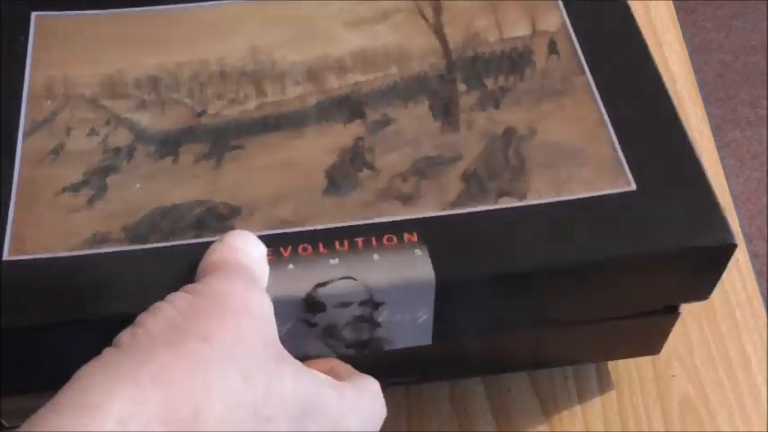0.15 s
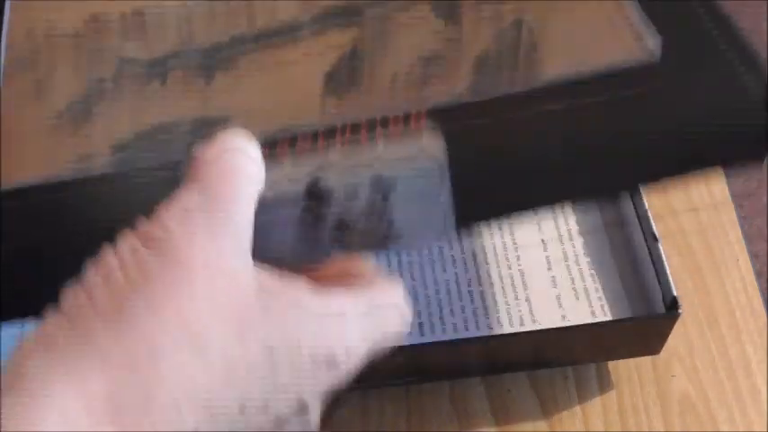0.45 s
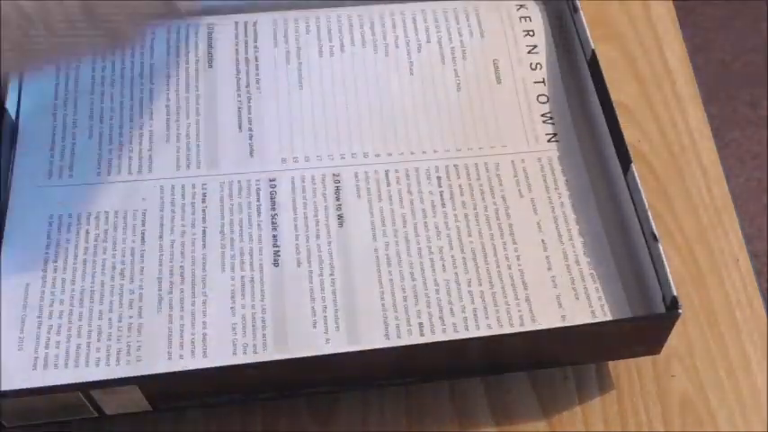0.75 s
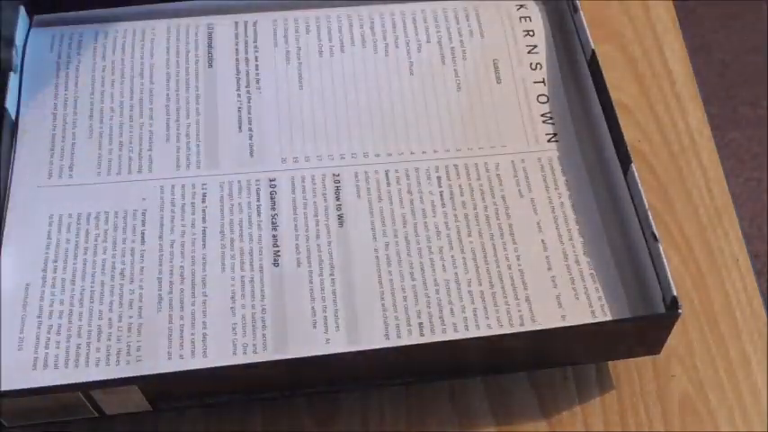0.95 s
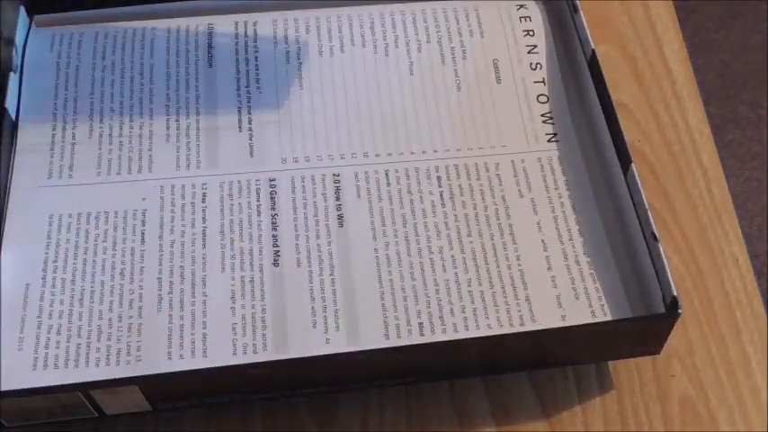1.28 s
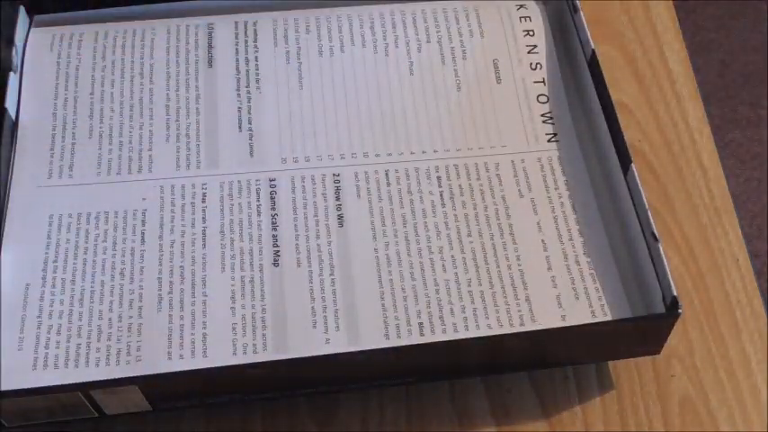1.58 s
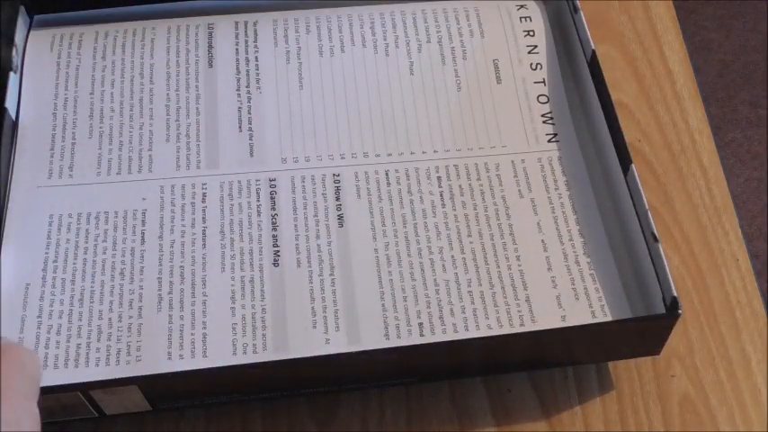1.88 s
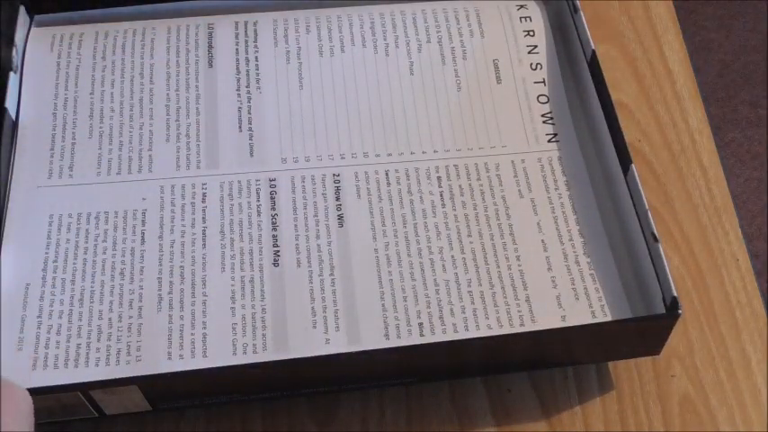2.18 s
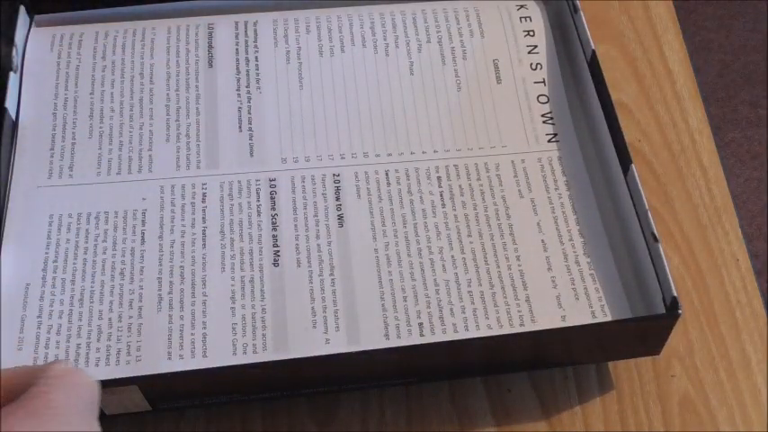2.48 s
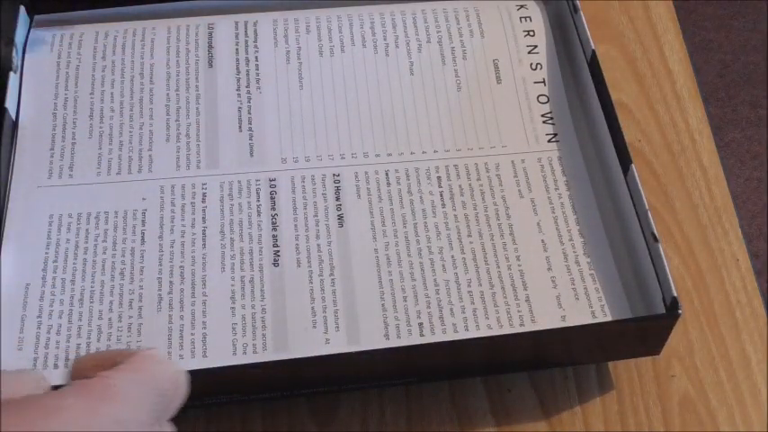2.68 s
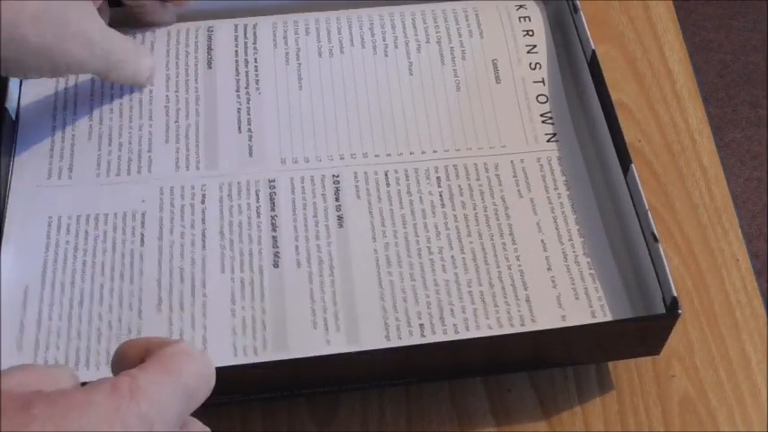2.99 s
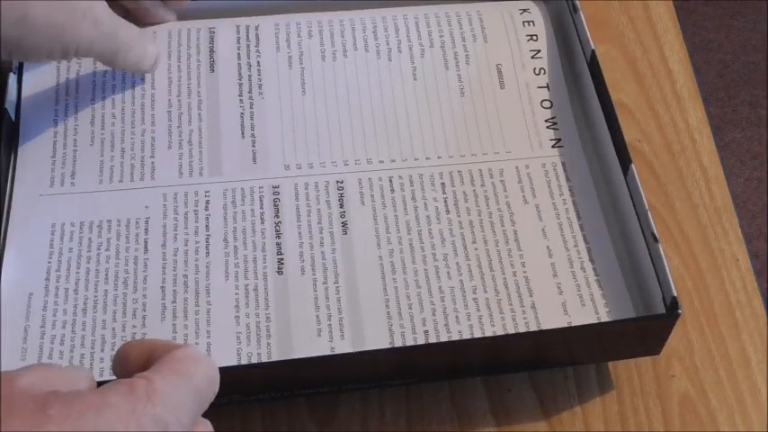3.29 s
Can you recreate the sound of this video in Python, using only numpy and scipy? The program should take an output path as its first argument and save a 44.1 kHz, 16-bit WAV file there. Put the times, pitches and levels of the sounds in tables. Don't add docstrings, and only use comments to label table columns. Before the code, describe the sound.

A cardboard box lid jerks loose with hollow pops, then small shuffles and taps, a firm clack near two seconds, and the loudest knocks around two and a half seconds; close microphone, small quiet room.

```python
import sys
import numpy as np
from scipy import signal
from scipy.fft import rfft, irfft, next_fast_len
from scipy.io import wavfile
from scipy.ndimage import map_coordinates

SR = 44100
rng = np.random.default_rng(int(sys.argv[2]) if len(sys.argv) > 2 else 0)


def magnitude_from_level(level_db):
    exponent = np.asarray(level_db, float) / 20
    return 10 ** exponent


def master_out(mix):
    frames = np.transpose(np.atleast_2d(mix))
    ceiling = np.clip(frames, -1, 1)
    pcm = np.round(ceiling * 32767).astype(np.int16)
    wavfile.write(sys.argv[1], SR, pcm)


N = 152145


def unit(x):
    return x / np.sqrt(np.mean(x ** 2) + 1e-20)


def along(points, hz):
    f, value = np.transpose(points)
    return np.interp(np.log(hz + 1), np.log(f + 1), value)


def wobble(rate):
    knots = rng.standard_normal(int(N * rate / SR) + 4)
    return map_coordinates(knots, [np.arange(N) * rate / SR])


def filtered(x, response):
    m = next_fast_len(N + SR // 2)
    return irfft(rfft(x, m) * response(np.fft.rfftfreq(m, 1 / SR)), m)[..., :N]


def colour(points):
    closed = [(points[0][0] / 3, -90)] + list(points)
    return lambda hz: magnitude_from_level(along(closed, hz))


# f/Hz, left-right likeness
PORT_LIKENESS = [(60, 1), (300, 0.69), (1500, 0.38), (5000, 0.64), (12000, 0.02)]


def spread(pair):
    def mid_side(hz):
        turn = np.arccos(np.clip(along(PORT_LIKENESS, hz), -1, 1)) / 2
        return np.array([np.cos(turn), np.sin(turn)])
    mid, side = filtered(pair, mid_side)
    return np.array([mid + side, mid - side])


def add(track, s, sound):
    track[round(s * SR):][:len(sound)] += sound


def ring(hz, db, t60, t, rise, wander=0):
    decay = magnitude_from_level(db - 60 * t / t60)
    return decay * np.sin(2 * np.pi * hz * t + wander) * (1 - np.exp(-t / rise))


# f/Hz, level/dB per Hz
AIR_COLOUR = [(141, 4), (240, -7), (354, 0), (734, -12), (1230, -12.5), (2760, -28), (6000, -36.5),
              (11000, -27), (16000, -33)]
# f/Hz, level/dB
CLOTH_COLOUR = [(1200, -4), (2500, -11), (4000, -7), (6000, -9.5), (9000, -7), (16000, -17)]
# t/s, level/dB
SLEEVE_MOVES = [
    (0, -67.5),
    (.62, -67),
    (1.9, -63.5),
    (2.08, -73),
    (3.45, -78),
]
AIR_DB = -56.5


def air():
    still, cloth = (unit(spread(filtered(rng.standard_normal((2, N)), colour(c))))
                    for c in (AIR_COLOUR, CLOTH_COLOUR))
    s, db = np.transpose(SLEEVE_MOVES)
    sleeve_db = np.interp(np.arange(N) / SR, s, db)
    return magnitude_from_level(AIR_DB + 0.13 * wobble(1.9)) * still + magnitude_from_level(sleeve_db + 0.61 * wobble(11)) * cloth


# f/Hz, level/dB per Hz
RUMBLE_COLOUR = [(25, 16), (60, -4.5), (110, -2), (200, -19)]
RUMBLE_DB, RUMBLE_SWING_DB = -57.5, -0.5


def rumble():
    lumps = magnitude_from_level(RUMBLE_SWING_DB * np.array([wobble(4.6), wobble(4.86)]))
    shudder = filtered(rng.standard_normal((2, N)), colour(RUMBLE_COLOUR + [(400, -90)]))
    return magnitude_from_level(RUMBLE_DB) * lumps * unit(shudder)


# t/s, length/s, level/dB, hiss over body/dB, loudest panel f/Hz
SLIDES = [(0, 0.17, -45, -19.5, 590), (0.17, 0.15, -50, -27, 900), (0.38, 0.048, -44.5, -11, 530),
          (0.512, 0.041, -49, -8, 1020), (0.597, 0.043, -46, -12, 1060), (0.68, 0.075, -54, -8, 1060),
          (0.864, 0.063, -52.5, -9.5, 900), (0.968, 0.033, -48, -11, 1250), (1.069, 0.044, -47, -9, 900),
          (0.201, 0.018, -48.5, -1, 1000), (1.603, 0.032, -63, -21, 1250), (3.12, 0.024, -59.5, -2, 1250),
          (2.961, 0.021, -66, 4, 1250), (2.298, 0.15, -58, -22, 345), (1.142, 0.074, -46, -8, 820),
          (1.283, 0.058, -54.5, -10, 520), (1.56, 0.098, -71, -0.5, 1250), (1.723, 0.031, -45, -15, 313),
          (1.931, 0.048, -40.5, -17.5, 640), (2.184, 0.017, -39.5, -19.5, 550),
          (2.298, 0.28, -66.5, 1.5, 1110), (2.47, 0.053, -34, -7.5, 625), (2.591, 0.057, -33.5, -14.5, 656),
          (2.626, 0.026, -37, -9.5, 900), (2.984, 0.056, -48.5, -10.5, 1250), (3, 0.02, -42, -33, 640),
          (3.247, 0.025, -55, -10.5, 600), (1.648, 0.034, -70, -32, 660)]
# f/Hz, width/Hz, level/dB
RUBBED_PANELS = [(149, 133, 5.5), (359, 97, 1), (450, 107, -4.5), (640, 65, -7.5), (900, 196, -8),
                 (1250, 117, -2), (2126, 680, -9.5)]
# f/Hz, level/dB
HISS_COLOUR = [(1500, 7.5), (2300, -1), (2900, 0.5), (4000, 4.5), (6000, -5.5), (10000, -5.5), (16000, -22)]
SLIDE_RISE, SLIDE_FALL_S = 0.12, 0.03
GRAINS_PER_S, GRAIN_DB, GRAIN_SHARE = 1200, 2.5, 0.4
FOCUS_DB_PER_OCT = 8.5


def slides():
    t = np.arange(N) / SR
    shape = np.array([
        magnitude_from_level(db) * np.clip((t - s) / (SLIDE_RISE * length), 0, 1)
        * np.exp(-np.clip(t - s - length, 0, None) / SLIDE_FALL_S)
        for s, length, db, _, _ in SLIDES])
    *_, hiss_db, focus_hz = np.transpose(SLIDES)

    when, size, sign = rng.random((3, N))
    grains = (when < GRAINS_PER_S / SR) * magnitude_from_level(-GRAIN_DB * np.log(size + 0.0033)) * np.sign(sign - 0.5)
    rasp = GRAIN_SHARE * unit(grains) + (1 - GRAIN_SHARE) * rng.standard_normal((2, N))
    rasp = rasp * magnitude_from_level(1.5 * wobble(60))

    body = np.zeros(N)
    for k, (hz, width, db) in enumerate(RUBBED_PANELS):
        def panel(f):
            resonance = 1j * f * width / (hz * hz - f * f + 1j * f * width)
            return resonance / (1 + (f / 2600) ** 4)
        drive = magnitude_from_level(-FOCUS_DB_PER_OCT * abs(np.log2(hz / focus_hz))) @ shape
        body += (-1) ** k * magnitude_from_level(db) * drive * unit(filtered(rasp[0], panel))

    soft = rng.standard_normal((2, N)) * magnitude_from_level(1.5 * wobble(45) + 1.5 * wobble(200))
    hiss = unit(spread(filtered(soft + 0.23 * rasp, colour(HISS_COLOUR))))
    return body, hiss * (magnitude_from_level(hiss_db) @ shape)


# t/s, peak level/dB, f/Hz
TICKS = [(0.0303, -41.5, 8700), (.1745, -46, 4050), (.178, -48, 12400), (.207, -33.5, 7170),
         (0.2188, -26.5, 3500), (.224, -46, 10500), (.388, -41, 4040), (1.947, -45, 4170),
         (1.905, -25.5, 3690), (2.446, -55, 4300), (2.614, -40, 4000), (2.645, -41, 10200),
         (2.696, -24, 3970), (2.697, -41.5, 8350), (2.706, -37, 3900), (2.713, -41, 3810)]
TICK_T60_S, TICK_SPREAD = 0.013, 0.075


def ticks():
    out, t = np.zeros(N + SR), np.arange(SR // 50) / SR
    for s, db, hz in TICKS:
        for offset, phase in zip(np.linspace(-2, 2, num=16), rng.standard_normal(16)):
            mode_hz = hz * np.exp(TICK_SPREAD * offset)
            add(out, s, ring(mode_hz, db - 10, TICK_T60_S, t, 3 / hz, 2 * phase))
    return out[:N]


# t/s, peak level/dB, f/Hz
DULL_KNOCKS = [(0.145, -22.5, 427), (0.173, -17.5, 450), (.187, -35, 450), (0.221, -30, 432),
               (.306, -34, 431), (0.386, -37, 416), (.43, -43, 422), (0.499, -43, 302), (.528, -36.5, 313),
               (0.674, -35, 292), (.625, -41.5, 318), (0.652, -31, 400), (.658, -33, 590),
               (0.824, -39.5, 241), (0.836, -30, 410), (1.118, -32, 392), (1.148, -34, 341),
               (1.18, -37.5, 300), (1.245, -44, 426), (1.658, -42.5, 674), (1.652, -27.5, 333),
               (1.672, -36, 280), (1.7, -33.5, 233), (1.731, -49, 333), (1.771, -50, 360),
               (1.896, -36, 203), (1.906, -24, 443), (1.911, -23.5, 640), (1.959, -34, 376),
               (2.18, -35.5, 425), (2.478, -17.5, 477), (2.497, -14.5, 259.6), (2.447, -32, 450),
               (2.585, -27, 660), (2.676, -29.5, 260), (2.652, -27, 450), (2.984, -36, 440),
               (3.156, -31, 458)]
# t/s, peak level/dB, f/Hz, edge crack over knock/dB
HARD_KNOCKS = [(0.151, -21.5, 1140, -19.5), (.174, -20.5, 1150, -20.5), (0.206, -12.5, 950, -17),
               (.238, -30, 1040, -13.5), (.295, -36, 900, -29), (0.218, -21, 900, -18),
               (0.535, -33, 1080, -26), (0.654, -39.5, 1180, -3), (0.825, -39.5, 910, 1),
               (0.913, -38, 1200, -3.5), (1.118, -39.5, 870, -1), (1.147, -37.5, 900, -17),
               (1.894, -46.5, 1290, -27), (1.904, -22.5, 1250, -30.5), (2.181, -38.5, 1250, -12),
               (2.448, -34, 1010, -9), (2.476, -12, 1140, -9.5), (2.583, -15.5, 1093, -19),
               (2.631, -17, 1075, -15), (2.59, -28, 1210, -23), (2.652, -24, 1130, -24),
               (2.667, -30.5, 1250, -25), (2.891, -44.5, 1400, -15.5), (3.015, -39, 1270, -18),
               (3.154, -32.5, 735, -15), (3.21, -42.5, 1260, -18.5), (3.291, -45.5, 1010, -19)]
# f/Hz, level/dB, t60/s
PANELS = [(219.4, -1, 0.16), (303.5, 1, 0.057), (373.6, -1.5, 0.13), (439.3, -1.5, 0.23),
          (568.5, 4.5, 0.043), (636.8, -1.5, 0.1), (751.5, -7, 0.071), (825, 2.5, 0.046), (1010, -3, 0.059),
          (1260, 9.5, 0.02), (1424, 5.5, 0.02)]
# f/Hz, level/dB
CRACK_COLOUR = [(1200, -7), (2200, 4), (2900, -5), (4000, 0.5), (6000, -12), (10000, -8.5), (16000, -21.5)]
DULL_CRACK_DB, DULL_DB_PER_OCT = -34.5, 4.5
POP_CYCLES, POP_RISE_CYCLES, POP_DB = 14.3, 0.95, 5.5
POP_SAG = 2
RING_DB, NEAR_DB_PER_OCT = -10.5, 5.5
PANEL_WANDER = 1.25
CRACK_T60_S = 0.02
RAGGED_DB, RAGGED_T60_S = -13.5, 0.075


def knocks():
    low, edge, t = np.zeros(N + SR), np.zeros(N + SR), np.arange(SR // 4) / SR
    ragged = magnitude_from_level(6 * wobble(300))
    drift = PANEL_WANDER * wobble(40)
    dull = [(*row, DULL_CRACK_DB, DULL_DB_PER_OCT) for row in DULL_KNOCKS]
    hard = [(*row, 0) for row in HARD_KNOCKS]
    for s, db, hz, crack_db, dull_db in dull + hard:
        luck = rng.standard_normal((len(PANELS), 2))
        starts = rng.integers(N - len(t), size=len(PANELS))
        neighbours = np.zeros(len(t))
        for (f, level, t60), (louder, sharper), i in zip(PANELS, luck, starts):
            octaves = np.log2(f / hz)
            level = level + 2 * louder - NEAR_DB_PER_OCT * abs(octaves) - dull_db * max(octaves, 0)
            wander = drift[i:i + len(t)] - drift[i]
            neighbours += ring(f * (1 + 0.021 * sharper), level, t60, t, 0.0007, wander)
        sag = -np.pi * POP_SAG * hz * t ** 2
        pop = ring(hz, POP_DB, POP_CYCLES / hz, t, POP_RISE_CYCLES / hz, sag)
        add(low, s, magnitude_from_level(db) * (pop + magnitude_from_level(RING_DB) * neighbours))

        tearing = magnitude_from_level(RAGGED_DB - 60 * t / RAGGED_T60_S) * ragged[starts[0]:][:len(t)]
        crack = (magnitude_from_level(-60 * t / CRACK_T60_S) + tearing) * (1 - np.exp(-t / 0.00023))
        add(edge, s, magnitude_from_level(db + crack_db) * crack * rng.standard_normal(len(t)))
    return low[:N], filtered(edge[:N], colour(CRACK_COLOUR)) * magnitude_from_level(7.0)


# t/s, peak level/dB, f/Hz, t60/s
TABLE_BLOWS = [(0.207, -34, 147.3, 0.34), (0.499, -51.5, 145.5, 0.15), (0.528, -47.5, 143, .2),
               (0.653, -37.5, 139, 0.18), (0.828, -39, 148.7, 0.68), (0.92, -39, 146.7, 0.37),
               (1.119, -45, 155, 0.17), (1.158, -41, 197, .12), (1.303, -53.5, 145, .2),
               (1.66, -39, 164, 0.16), (1.901, -29.5, 149.4, .34), (2.232, -34.5, 148.7, 0.32),
               (2.479, -23, 147.7, 0.3), (2.583, -30.5, 148, 0.21), (2.61, -28, 188, 0.1),
               (2.653, -31.5, 149, 0.45), (3.163, -52.5, 146, 0.33)]
TOP_RISE_S, TOP_DB, TOP_WANDER = 0.0012, 6.5, 0.68
TOP_OVERTONE, TOP_OVERTONE_DB = 1.9, -16


def table():
    top, t, drift = np.zeros(N + SR), np.arange(SR // 2) / SR, wobble(24.87)
    for s, db, hz, t60 in TABLE_BLOWS:
        wander = np.roll(drift, -round(s * SR))[:len(t)]
        wander = TOP_WANDER * (wander - wander[0])
        add(top, s, ring(hz, db + TOP_DB, t60, t, TOP_RISE_S, wander))
        add(top, s, ring(TOP_OVERTONE * hz, db + TOP_OVERTONE_DB, t60, t, TOP_RISE_S))
    return top[:N]


STAPLE_S, STAPLE_HZ, STAPLE_DB, STAPLE_T60_S, STAPLE_FLUTTER_DB = 0.208, 7150, -50, 0.28, 3


def staple():
    out, t = np.zeros(N + SR), np.arange(SR // 4) / SR
    wander = wobble(590)[:len(t)]
    note = ring(STAPLE_HZ, STAPLE_DB, STAPLE_T60_S, t, 20 / STAPLE_HZ, wander)
    add(out, STAPLE_S, note * magnitude_from_level(STAPLE_FLUTTER_DB * wobble(254)[:len(t)]))
    return out[:N]


# t/s, length/s, level/dB
WISPS = [
    (0.61, 0.041, -60),
    (0.955, 0.051, -57),
    (1.125, 0.11, -61),
    (1.72, 0.1, -60.5),
    (1.944, .06, -64),
    (2.962, 0.042, -63.5),
]
WISP_HZ = 10500


def wisps():
    t = np.arange(N) / SR
    swell = sum(magnitude_from_level(db) * np.sin(np.pi * np.clip((t - s) / length, 0, 1) ** 0.66)
                for s, length, db in WISPS)
    fizz = filtered(rng.standard_normal((2, N)),
                    lambda f: 1 / (1 + (2 * (f - WISP_HZ) / (WISP_HZ / 2)) ** 2))
    return swell * magnitude_from_level(1.3 * wobble(90)) * unit(spread(fizz))


# t/s, peak level/dB, push length/s
SNAPS = [
    (0.6538, -26.5, 0.00033),
    (0.8244, -29.5, 0.00055),
    (1.9057, -16, 0.00027),
    (2.4753, -10.5, 0.00035),
]


def snaps():
    out, t = np.zeros(N + SR), np.arange(SR // 100) / SR
    for s, db, length in SNAPS:
        x = t / length
        add(out, s, magnitude_from_level(db) * np.e * x * (2 - x) * np.exp(-x))
    return out[:N]


CREAK_S, CREAK_DB, CREAK_RISE_S = 3.29, -56.5, 0.017
CREAK_HZ, CREAK_CLIMB_HZ_PER_S, CREAK_FLUTTER_DB = 430, 500, 4


def creak():
    t = np.clip(np.arange(N) / SR - CREAK_S, 0, None)
    phase = 2 * np.pi * (CREAK_HZ * t + CREAK_CLIMB_HZ_PER_S * t ** 2 / 2) + wobble(59)
    level = magnitude_from_level(CREAK_DB + CREAK_FLUTTER_DB * wobble(78))
    return level * (1 - np.exp(-t / CREAK_RISE_S)) * np.sin(phase)


# f/Hz, t60/s
ROOM_DECAY = [(150, 0.46), (900, 0.31), (5000, 0.3), (13000, 0.16)]
ROOM_WAIT_S = 0.004


def room(x):
    out, step = np.zeros((2, N + 2 * SR)), SR // 8
    for i in range(0, N, step):
        hz, t, z = signal.stft(rng.standard_normal((2, SR // 2)), SR, nperseg=256)
        decay = magnitude_from_level(-60 * t / along(ROOM_DECAY, hz)[:, None])
        tail = signal.istft(z * decay, SR, nperseg=256)[1]
        wet = signal.fftconvolve(x[None, i:i + step], tail / np.linalg.norm(tail[0]), axes=1)
        j = i + round(ROOM_WAIT_S * SR)
        out[:, j:j + wet.shape[1]] += wet
    return spread(out[:, :N])


PAN_DB, EDGE_SIDE = 0.5, 0.4
ROOM_DB, EDGE_ROOM_DB = -7.5, -9.5


def scene():
    body, hiss = slides()
    low, edge = knocks()
    low = low + snaps() + creak()
    edge = edge + ticks() + staple()
    pan = magnitude_from_level(PAN_DB * wobble(4.5) / 2)
    centre = (low + edge + body) * np.array([pan, 1 / pan]) + table()
    edge_side = EDGE_SIDE * (np.roll(edge, shift=1) - np.roll(edge, shift=-1)) * [[1], [-1]]
    answer = room(magnitude_from_level(ROOM_DB) * (low + body) + magnitude_from_level(EDGE_ROOM_DB) * (edge + hiss[0]))
    return centre + edge_side + hiss + answer + wisps() + air() + rumble()


def top_cut(x):
    return signal.sosfilt(signal.butter(12, 16980, fs=SR, output="sos"), x)


def record(dry):
    def microphone(hz):
        bass_cut = (1j * hz / (1j * hz + 70)) ** 3
        return bass_cut / (1 + (hz / 15850) ** 80)
    mix = filtered(dry, microphone)
    return top_cut(mix)


dry = scene()
out = record(dry)
master_out(out)
```